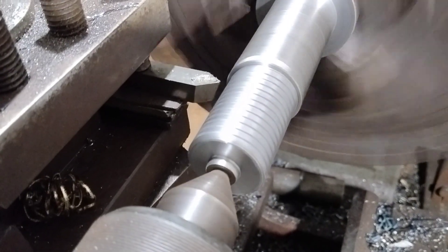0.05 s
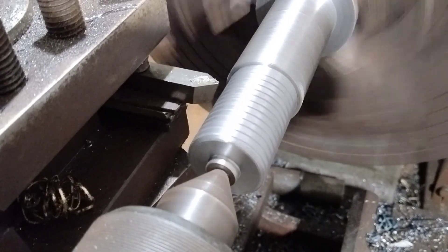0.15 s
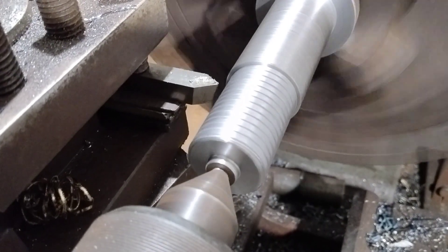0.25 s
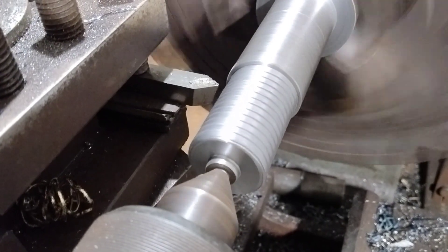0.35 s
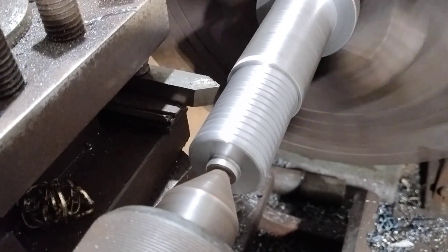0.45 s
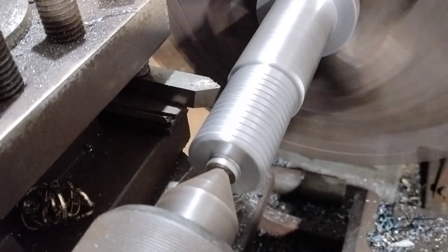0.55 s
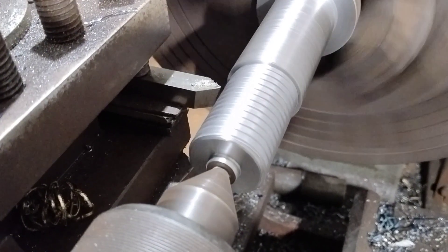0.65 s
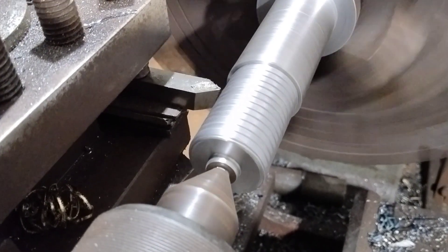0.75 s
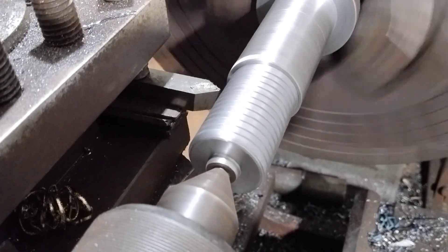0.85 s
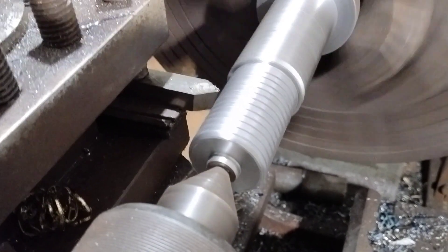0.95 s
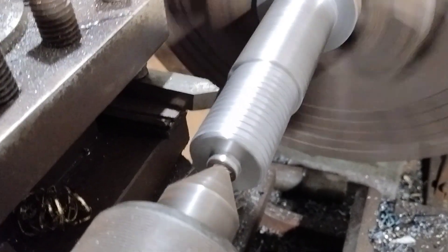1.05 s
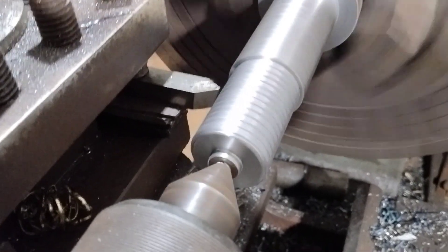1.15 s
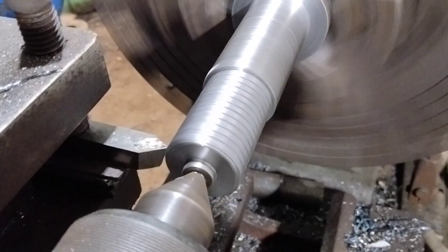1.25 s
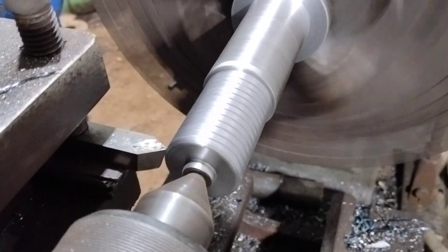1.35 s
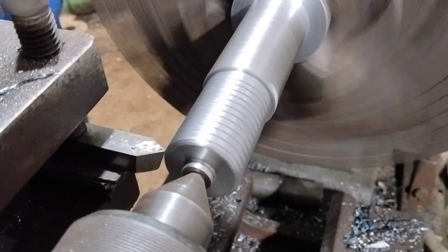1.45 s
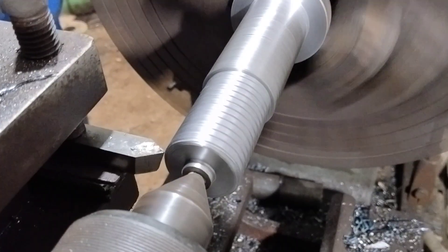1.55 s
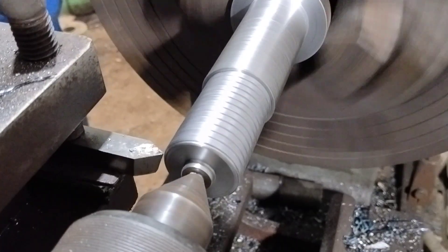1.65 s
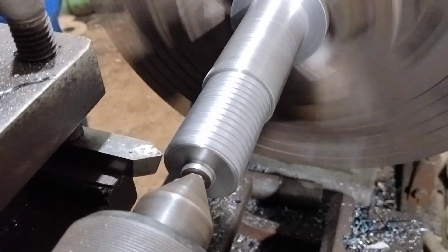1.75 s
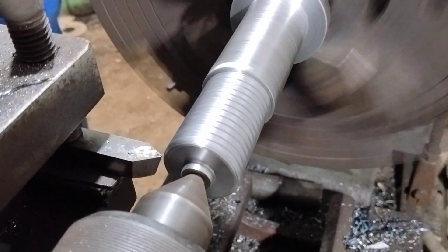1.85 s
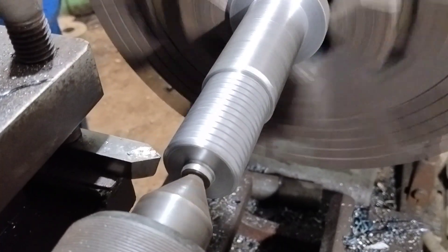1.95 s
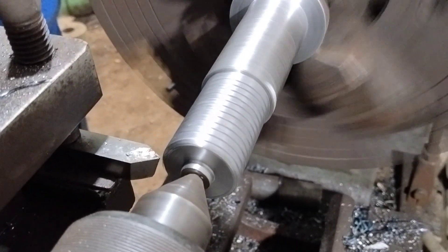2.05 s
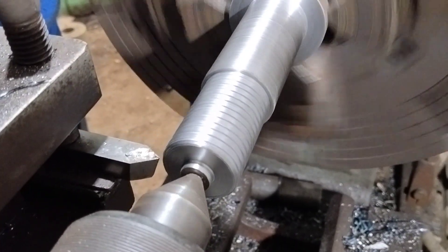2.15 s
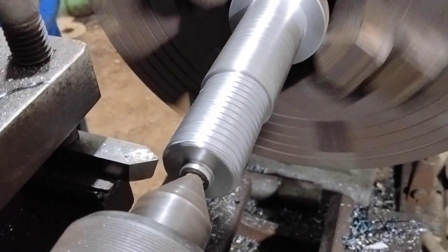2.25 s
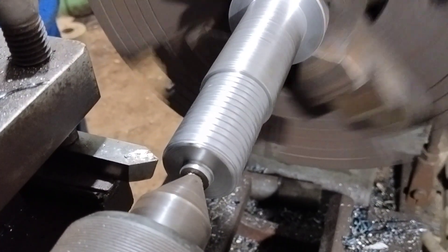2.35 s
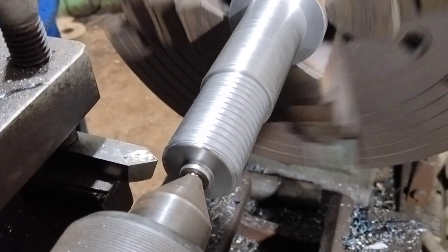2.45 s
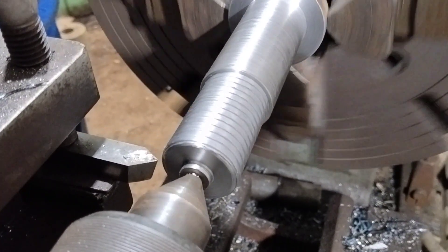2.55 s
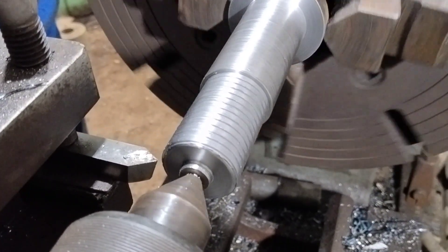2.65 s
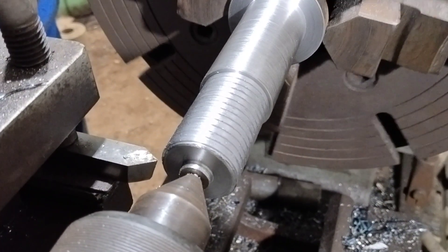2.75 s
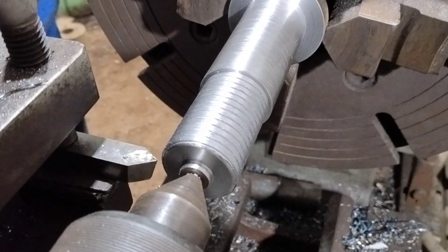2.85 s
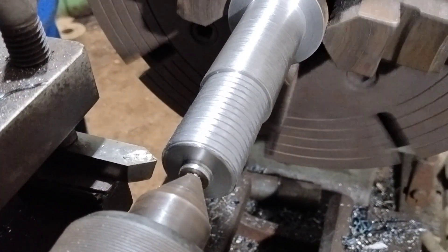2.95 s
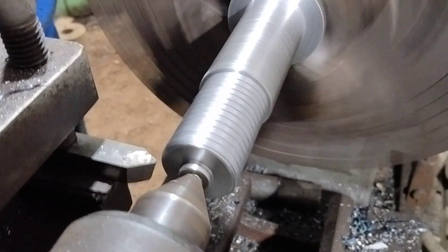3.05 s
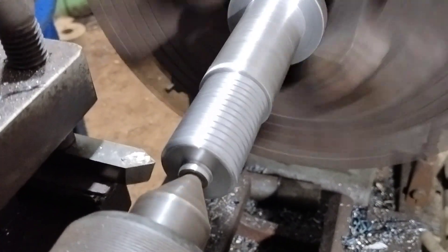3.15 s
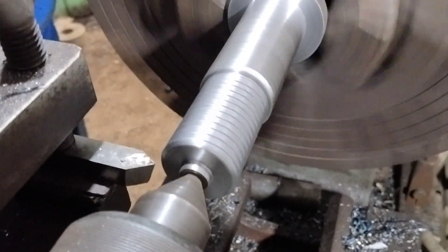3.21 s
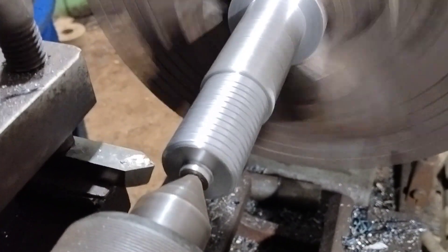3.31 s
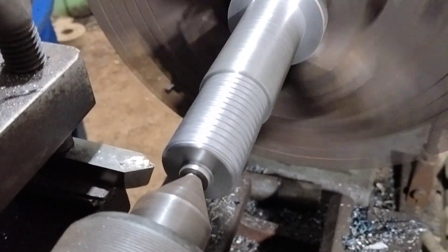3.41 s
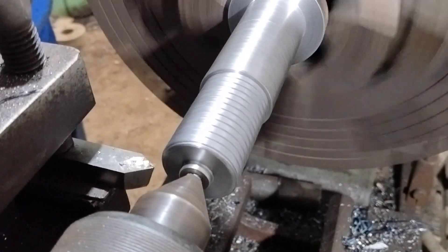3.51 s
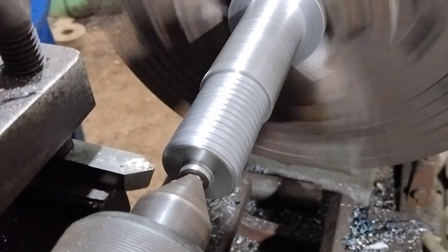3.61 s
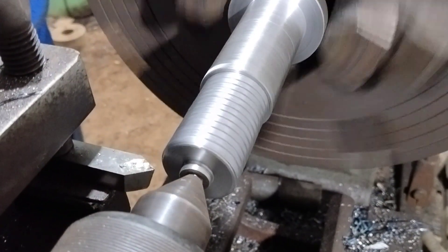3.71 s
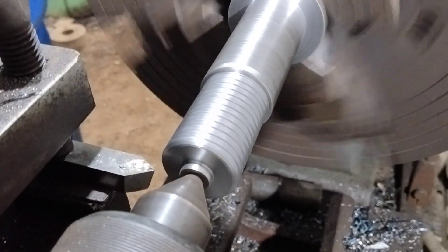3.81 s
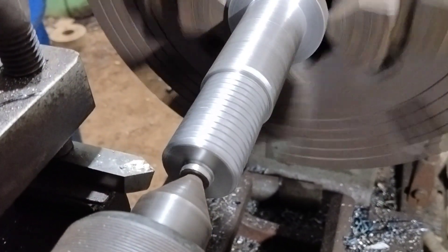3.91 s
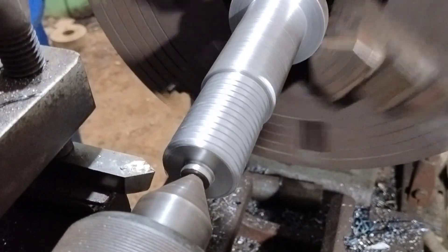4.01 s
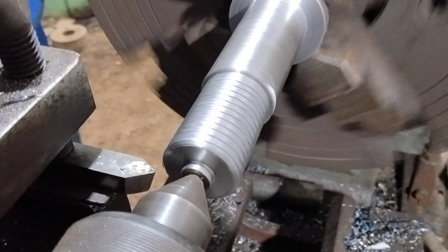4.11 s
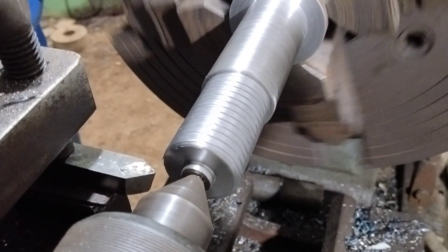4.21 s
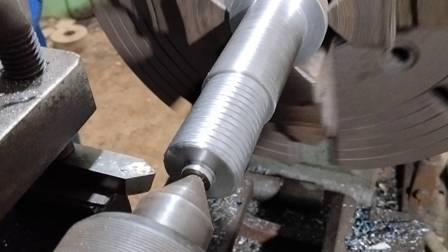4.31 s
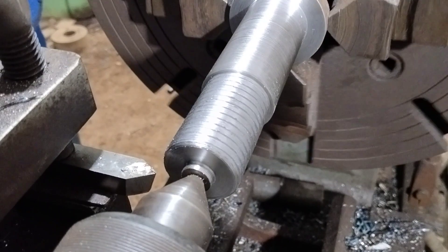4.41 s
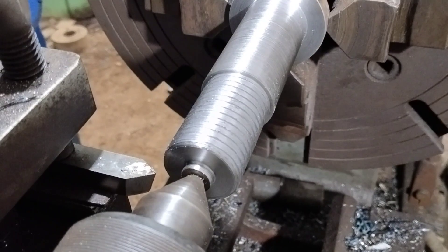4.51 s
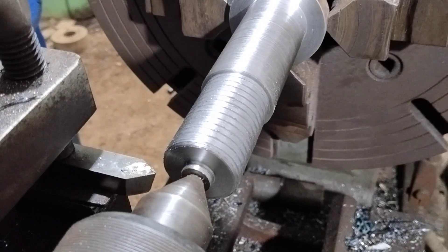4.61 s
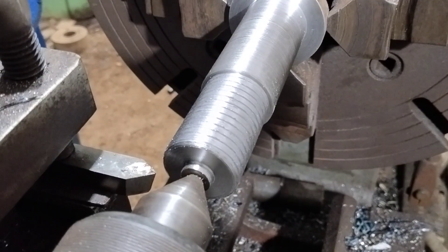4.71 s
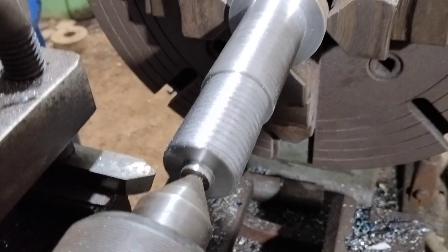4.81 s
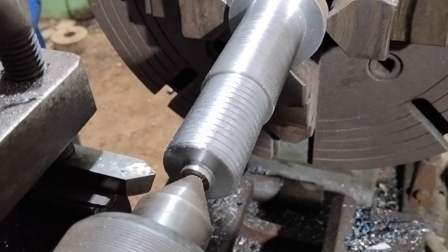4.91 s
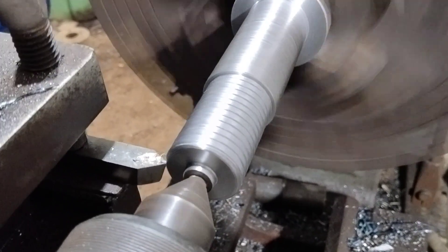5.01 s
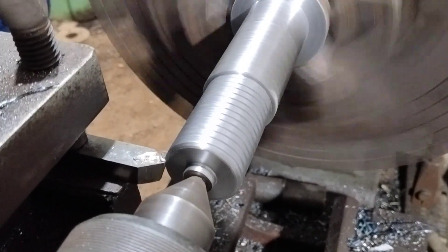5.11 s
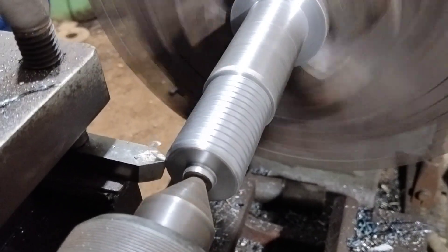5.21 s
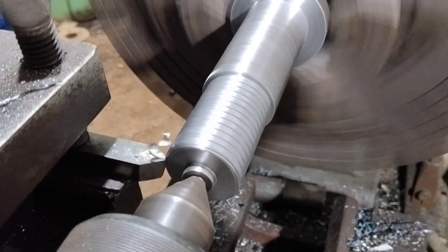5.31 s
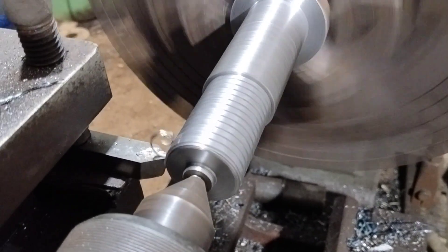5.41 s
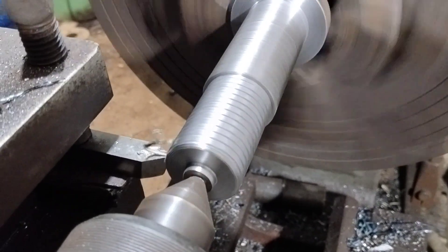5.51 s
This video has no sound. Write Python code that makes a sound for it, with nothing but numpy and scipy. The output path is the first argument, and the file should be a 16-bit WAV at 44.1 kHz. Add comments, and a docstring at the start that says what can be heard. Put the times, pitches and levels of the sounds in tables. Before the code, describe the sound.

A lathe heard close by in a workshop. From 0 to 1.15 s its headstock gears growl roughly, with a dry metallic rattle that swells about three times a second, some dull knocks and a faint upward-sliding scrape near 0.9 s. Complete silence for about a tenth of a second, then at 1.26 s a weaker growl returns; levers chatter around 1.4 s and clack sharply at 1.55 s. The gears coast down, ticking and thinning out, to almost nothing by 2.9 s. At 3.13 to 3.16 s a loud double clack and thud engage reverse, with a small high metallic ringing, fine hiss and a quick rising whine to 3.3 s. The gears run with repeated knocks, sing thinly, rasp around 4.1 s and die by 4.4 s, leaving faint rumble. At 4.98 s full gear noise snaps back in; a knock comes at 5.38 s and a tool squeal from 5.47 s to the end at 5.56 s.

```python
"""A metal lathe in a workshop, heard from beside the tool post. Its gears rattle in the cast headstock, the
sound cuts out for a tenth of a second, then levers chatter and knock and the gears coast to a halt. With a
clack they are thrown into reverse, whine up to speed, rasp and stop again; at 4.98 s the sound jumps straight
to the gears running at full speed, and the tool squeals. Random tooth impacts drive resonances of headstock,
casing and cover; noise bursts make the knocks."""
import sys
import numpy as np
from scipy import signal
from scipy.fft import rfft, irfft, next_fast_len
from scipy.io import wavfile
from scipy.ndimage import uniform_filter1d, minimum_filter1d

SR = 44100
rng = np.random.default_rng(int(sys.argv[2]) if len(sys.argv) > 2 else 0)


def generate_wav(signal):
    """Clip the signal to [-1, 1] and save it as 16-bit WAV at the path in sys.argv[1]."""
    frames = np.transpose(np.atleast_2d(signal))
    scaled = np.clip(frames, -1, 1) * 32767
    pcm = np.round(scaled).astype(np.int16)
    wavfile.write(sys.argv[1], SR, pcm)


N = 245328

# What the levers ring with. Each row: pitch in Hz, relative level in dB, t60 in s.
LEVER = [(3410, 3, 0.0037), (3845, 8.5, 0.009), (4040, 2, 0.011), (4730, 12, 0.027), (4874, 0.5, 0.0091),
         (5470, -29, 0.029), (5800, -33, 0.03)]


def undb(db):
    """Decibels to gain."""
    return 10 ** (np.asarray(db) / 20)


def unit(x):
    """Scale to rms 1."""
    return x / np.sqrt(np.mean(x ** 2))


def colour(x, points):
    """Shape by a (Hz, dB) spectrum, silent outside it."""
    hz, db = np.transpose(points)
    size = next_fast_len(N)
    f = np.maximum(np.arange(size // 2 + 1) * SR / size, 1)
    gain = undb(np.interp(np.log(f), np.log(hz), db, -120, -120))
    return irfft(rfft(x, size) * gain, size)[:N]


def resonate(x, hz, width_hz):
    """One resonance, gain 1 at its centre."""
    return signal.lfilter(*signal.iirpeak(hz, hz / width_hz, fs=SR), x)


def twice(x, hz, width_hz):
    """A resonance with steep skirts, rms 1."""
    return unit(resonate(resonate(x, hz, width_hz), hz, 3 * width_hz))


def ring(x, modes):
    """Excite (Hz, dB, t60 in s) modes; a shorter decay means a wider resonance."""
    return sum(undb(db) * resonate(x, hz, np.log(1000) / np.pi / t60) for hz, db, t60 in modes)


def walk(rate):
    """A random drift: levels held 1 / rate s and slewed twice; spread near 1."""
    k = int(SR / rate)
    steps = np.repeat(rng.standard_normal(N // k + 1), k)
    return 1.3 * uniform_filter1d(uniform_filter1d(steps, k), k)[:N]


def curves(tables):
    """Every column of a run of tables, one value a sample; a table holds its last value until the next begins."""
    t = np.arange(N) / SR
    out = np.zeros((len(tables[0][0]) - 1, N))
    for table in tables:
        s, *columns = np.transpose(table)
        out[:, t >= s[0]] = [np.interp(t[t >= s[0]], s, c) for c in columns]
    return uniform_filter1d(out, size=int(.002 * SR))  # round the corners over 2 ms


def envelope(rise, t60):
    """A short rise, then a decay (both in ms)."""
    ms = np.arange(int(.4 * SR)) * 1000 / SR
    return np.minimum(ms / max(rise, .2), 1) * 1000. ** (-np.maximum(ms - rise, 0) / max(t60, 5))


def teeth(rate, spread_db, share):
    """Irregular tooth impacts (rate per s) of scattered size, a share of the power, over rubbing noise."""
    hit = rng.random(N) < rate / SR
    size = np.minimum(rng.exponential(size=N), 3.5)  # caps the hardest impact, in spreads
    clicks = hit * undb(spread_db * size) * rng.choice([-1, 1], N)
    return np.sqrt(share) * unit(clicks) + np.sqrt(1 - share) * rng.standard_normal(N)


def waver(hz, depth):
    """A steady sine, rms 1, whose pitch wanders by a share of itself."""
    return np.sqrt(2) * np.sin(2 * np.pi * np.cumsum(hz * (1 + depth * walk(30))) / SR)


def tone(table, gain_db, waver_db, jitter):
    """A gliding, wavering, rough tone that fades in and out at the ends of its table."""
    s, hz, db = np.transpose(table)
    t = np.arange(N) / SR
    fade = np.clip(np.minimum(t - s[0], s[-1] - t) / 0.014, 0, 1)
    phase = 2 * np.pi * np.cumsum(np.interp(t, s, hz) * (1 + jitter * walk(130))) / SR
    level = undb(np.interp(t, s, db) + gain_db + waver_db * walk(80))
    return np.sqrt(2) * fade * level * np.sin(phase)


def slide(tables, width_hz):
    """A narrow band of noise whose centre and level move: slow noise carried by a gliding sine and cosine."""
    db, hz = curves(tables)
    slow = signal.lfilter(*signal.butter(2, width_hz / 2, fs=SR), rng.standard_normal((2, N)))
    phase = 2 * np.pi * np.cumsum(hz) / SR
    return undb(db) * unit(slow[0] * np.cos(phase) + slow[1] * np.sin(phase))


def workshop():
    """Coloured noise as the workshop rumble, restless in level."""
    # Each row: frequency in Hz, relative level in dB per Hz.
    shop_colour = [(15, -11.5), (35, 10.5), (60, -5), (100, -6.5), (330, -13.5), (1000, -26), (3000, -38),
                   (8000, -44.5), (15600, -41.5)]
    # The rumble dips briefly in each pause. Each row: time in s, level in dB.
    shop_level = [
        [(0, -63), (1.3, -49.5), (2.5, -52.5), (2.95, -54.5), (3.02, -68.5), (3.07, -61), (4.6, -56),
         (4.7, -58), (4.765, -73.5), (4.785, -48), (4.82, -57.5), (4.92, -60), (5.56, -55)],
    ]
    rumble = unit(colour(rng.standard_normal(N), shop_colour))
    return undb(curves(shop_level)[0] + 2. * walk(50)) * rumble


def ping():
    """A small part chatters on after the clutch: close high modes, kept ringing by fading impacts."""
    start_s, level_db, t60_s = 3.152, -28, .32
    # Each row: pitch in Hz, relative level in dB, t60 in s.
    ping_modes = [(9220, -9, .02), (9350, 0, .035), (9470, -6, .025)]
    t = np.arange(N) / SR - start_s
    ringing = ring(teeth(900., 2, .4), ping_modes)
    ringing = unit(colour(ringing, [(7500, -38.5), (8900, 6.5), (9700, -11.0), (10500, -49.5)]))
    fade = np.clip(t / .002, 0, 1) * 1000. ** (-np.maximum(t, 0) / t60_s)
    return undb(level_db) * ringing * fade


def notes():
    """Knocks and squeaks that each ring one note of the metal as narrow noise, and one click at a cut in the sound."""
    # Each row: start in s, level in dB, pitch in Hz, t60 in ms.
    note_rows = [(.99, -39, 4990, 220), (1.409, -17, 1172, 360), (1.54, -25, 5720, 115),
                 (1.555, -19, 1060, 150), (2.0, -30, 970, 340), (2.24, -38, 1580, 120),
                 (2.885, -69.5, 1540, 89), (3.056, -58, 1050, 640), (3.089, -66, 1030, 100),
                 (3.131, -20, 1323, 180), (3.153, -8, 605, 46), (3.157, -9.5, 3590, 17),
                 (3.309, -10.5, 480, 145), (3.46, -21, 810, 230), (3.63, -12.5, 987, 88),
                 (3.691, -22.5, 1295, 360), (3.905, -51, 7350, 170), (3.915, -9.5, 547, 120),
                 (4.09, -13, 494, 150), (4.255, -30, 850, 72), (4.28, -38.5, 710, 280),
                 (4.3, -55, 2720, 170), (4.855, -55, 1245, 54), (5.375, -15, 945, 120),
                 (5.4, -22.5, 120, 400), (5.5, -42, 2340, 240), (5.535, -34, 3900, 200)]
    click_s, click_db = 1.2855, -22  # where the sound was cut and joined
    out = np.zeros(N + SR)
    for s, db, hz, t60 in note_rows:
        shape = envelope(.045 * t60, t60)
        note = twice(rng.standard_normal(len(shape)), hz, 30 + .02 * hz)  # high notes are wider
        out[int(s * SR):][:len(shape)] += undb(db) * shape * note
    out[int(click_s * SR)] += undb(click_db)  # one single sample
    return out[:N]


def knocks():
    """Levers, clutch and gear play: short noise scrapes ring the levers, thud in the casting and spit treble."""
    # Each row: start in s, clack and thud level in dB (before trims), clack centre in Hz, t60 in ms.
    knock_rows = [(.295, -35.5, -13.5, 2556, 200), (.624, -36.5, -20, 3850, 37), (.68, -35, -19, 2610, 150),
                  (.755, -29.5, -18, 2510, 80), (.87, -43.5, -37.5, 6000, 30),
                  (0.937, -38, -16.5, 2200, 99), (1.361, -39, -39, 4470, 190), (1.389, -33, -33, 4100, 50),
                  (1.413, -39, -36.5, 4680, 150), (1.532, -31, -18, 5600, 75),
                  (1.543, -11, -24.5, 4850, 67), (1.553, -10.5, -14, 4580, 41),
                  (1.564, -23.5, -21, 3630, 130), (1.709, -38.5, -24.5, 3880, 71),
                  (1.777, -38.5, -31, 3860, 110), (1.875, -34.5, -25, 3600, 96),
                  (1.991, -42, -34.5, 4200, 250), (2.131, -47, -27.5, 3000, 64),
                  (2.324, -45.5, -41.5, 3880, 57), (2.407, -54, -38, 3430, 82),
                  (2.52, -52.5, -47, 3960, 140), (2.686, -55, -54, 3560, 100), (2.794, -51, -51, 4300, 73),
                  (2.817, -61, -54.5, 3920, 100), (2.879, -70, -59, 2920, 83),
                  (3.055, -54.5, -59.5, 4270, 100), (3.091, -64, -62, 4020, 35),
                  (3.128, -28.5, -38, 4500, 82), (3.135, -12, -22.5, 5040, 57),
                  (3.152, -26, -12, 4160, 130), (3.242, -31, -23.5, 3730, 110),
                  (3.294, -16.5, -13.5, 4770, 25), (3.306, -16, -15, 4550, 70),
                  (3.425, -31, -21, 2570, 140), (3.46, -33.5, -26, 2600, 100),
                  (3.575, -27, -14.5, 2360, 120), (3.605, -33, -20.5, 2284, 110),
                  (3.761, -39.5, -35.5, 5250, 60), (3.775, -32.5, -15, 2614, 90),
                  (3.843, -36.5, -41.5, 3560, 68), (3.883, -63, -19, 3020, 43),
                  (3.913, -29, -17.5, 3620, 70), (3.942, -38.5, -25.5, 4950, 44),
                  (4.295, -53.5, -44, 4500, 50), (4.325, -70, -57, 6500, 30), (4.37, -60, -58, 2800, 40),
                  (4.43, -59.5, -63.5, 4700, 297), (4.656, -84, -55.5, 2950, 46),
                  (4.782, -77, -60, 3520, 46), (4.803, -74.5, -63.5, 3490, 51),
                  (5.375, -31.5, -16.5, 4750, 160)]
    # What the casting thuds with. Each row: pitch in Hz, relative level in dB, t60 in s.
    thud_modes = [(632, -8.5, 0.048), (969, -2.5, 0.028), (1350, -4, 0.037), (1580, -9, 0.0084)]
    # The spat treble. Each row: frequency in Hz, relative level in dB per Hz.
    spit_colour = [(5500, -37.5), (6800, -2), (7800, -1.5), (9300, -9), (10300, -16.5), (12500, -31.5),
                   (15600, -33)]
    mid, low, top = np.zeros((3, N))
    for s, db, thud_db, hz, t60 in knock_rows:
        i = int(s * SR)
        shape = envelope(.09 * t60, t60)  # long scrapes start softly
        burst = shape * rng.standard_normal(len(shape))
        spit_db = db - 10.5 + 10.5 * (hz / 1000 - 5.5)  # brighter knocks spit more
        mid[i:i + len(shape)] += undb(db) * resonate(resonate(burst, hz, 3000), hz, 3000)[:N - i]
        low[i:i + len(shape)] += undb(thud_db) * burst[:N - i]
        top[i:i + len(shape)] += undb(spit_db) * burst[:N - i]
    clack = undb(7.5) * mid + undb(-1.5) * ring(mid, LEVER)
    clack = colour(clack, [(1500, -38.0), (2100, -8.5), (2800, -3.0), (6200, -9.0), (8000, -28.0), (12000, -61.0)])
    thud = undb(8.0) * low + undb(15.5) * ring(low, thud_modes)
    thud = colour(thud, [(250, -40.5), (500, 3.5), (2000, -5.0), (2800, -19.0), (5000, -79.5)])
    return clack + thud + undb(13.5) * colour(top, spit_colour)


def whine():
    """Gear whine that climbs as the spindle picks up speed, a rough gliding sine."""
    # Each row: time in s, pitch in Hz, level in dB before a small trim.
    whine_glide = [(3.17, 420, -28), (3.2, 450, -20), (3.212, 500, -23), (3.222, 560, -18),
                   (3.235, 620, -21), (3.25, 700, -15), (3.27, 740, -18), (3.295, 790, -28)]
    return tone(whine_glide, -1.5, 2., .04)


def squeal():
    """Tool tip squeal on entering the metal, a nearly steady sine."""
    # Each row: time in s, pitch in Hz, level in dB.
    squeal_glide = [(5.47, 1240, -36), (5.505, 1250, -20), (5.54, 1250, -17), (5.6, 1245, -15)]
    return tone(squeal_glide, 0, 1.5, .006)


def mesh():
    """A rough band of the gear mesh that slides and surges."""
    # Each row: time in s, level in dB, centre in Hz.
    mesh_band = [
        [(0.0, -12, 880.9), (0.03, -18, 878.3), (0.192, -26.5, 908.5), (0.246, -18, 918.6), (0.288, -21, 857.3),
         (0.326, -13, 878), (0.352, -25, 889.2), (0.424, -17.5, 885), (0.468, -22.5, 875), (0.692, -19, 886),
         (0.758, -27, 861.6), (0.796, -18, 850), (0.93, -34, 899), (0.954, -31, 904), (1.11, -18.5, 926.1),
         (1.14, -34, 960)],
        [(1.263, -37, 866.5), (1.355, -38, 909), (1.381, -24, 897.4), (1.417, -21.5, 914), (1.495, -25, 886.7),
         (1.613, -41, 920.3), (1.681, -26, 870.5), (1.861, -39, 874.4), (1.893, -28.5, 879), (1.975, -42, 894),
         (2.021, -31.5, 939), (2.059, -46, 919), (2.239, -47, 862.2), (2.399, -41, 869.1), (3.019, -99, 883),
         (3.12, -52.5, 948.8)],
        [(3.155, -30, 915.4), (3.235, -32, 833), (3.301, -22, 867.4), (3.427, -43, 868), (3.467, -21, 849.6),
         (3.689, -31, 889), (3.941, -26.5, 832), (3.975, -39.5, 883), (4.173, -28, 862), (4.213, -55, 873),
         (4.273, -32.5, 909.4), (4.313, -60, 840), (4.737, -93, 858), (4.807, -76, 874.7), (4.929, -91.5, 850),
         (4.965, -61, 854.7)],
        [(4.985, -26, 857), (5.003, -24, 867), (5.093, -28.5, 847), (5.197, -25, 903), (5.219, -31, 886),
         (5.289, -23, 829.6), (5.323, -36, 853), (5.387, -20, 905), (5.495, -34, 896), (5.56, -28, 817)],
    ]
    return slide(mesh_band, 140)


def scrape():
    """A scrape slides upward in the first stretch; a rough squeal rises and sinks in the last."""
    # Each row: time in s, level in dB, centre in Hz.
    scrape_band = [
        [(0, -120, 1900), (.83, -60, 1800), (.86, -36, 1850), (.93, -34, 2000), (.96, -44, 2050),
         (.99, -44, 2200), (1.01, -37, 2280), (1.03, -41, 2480), (1.06, -43, 2620), (1.1, -44, 2720),
         (1.14, -60, 2750)],
        [(1.2, -120, 1100)],
        [(4.985, -40, 1100), (5.15, -34, 1130), (5.2, -25, 1200), (5.25, -32, 1200), (5.33, -25, 1220),
         (5.4, -31, 1180), (5.47, -36, 1120), (5.51, -27, 1090), (5.56, -20, 1080)],
    ]
    return slide(scrape_band, 160)


def throb():
    """A flare and a slight dip that each return once a spindle turn, in dB."""
    turn_s, sharpness = .36, 6
    # Each row: time of one peak in s, height in dB at full throb share.
    flares = [(.29, 3), (0.429, -0.5)]
    t = np.arange(N) / SR
    return sum(db * np.exp(sharpness * (np.cos(2 * np.pi * (t - s) / turn_s) - 1)) for s, db in flares)


def balance(gear_db):
    """Each layer's level: its share at full speed, shifted as the growl sinks, drifting alone."""
    # Running, coasting, reversing, then full speed again after a jump. Each row: start in s, then at full speed
    # the upper group, bed, # hum and grind in dB over the growl, levers in dB over the rattle, motor in dB over
    # the growl, throb share 0-1.
    full_speed = [
        [(0.00038, -7.5, -7, -22, -22, -6, -25.5, 0.89)],
        [(1.263, -8, -6.5, -15, -21.5, -11.5, -28, .1)],
        [(3.155, -7.5, -7, -19.5, -22.5, -6, -23.5, .1)],
        [(4.985, -5, -9, -21, -21, -6.5, -13.5, 0.22)],
    ]
    # One row: dB gained per dB the growl sinks, for upper group, bed, hum, grind, levers, motor.
    linger = (-0.11, 0.12, 0.5, -0.13, 0.074, 0.0069)
    *full_db, share = curves(full_speed)
    sunk_db = -18 - gear_db  # below the growl at full speed
    return [db + k * sunk_db + 1.1 * walk(14) for db, k in zip(full_db, linger)], share


def strays(edges):
    """Sharp impacts coloured as the clutch's fine hiss, a rasp and a chattering lever."""
    # Far above the clatter, strongest while the clutch slips. Each row: time in s, level in dB.
    slip_level = [
        [(0, -81), (1.14, -80.5), (1.6, -92), (2.0, -95), (3.13, -120), (3.14, -66), (3.17, -60), (3.18, -70),
         (3.27, -64.5), (3.29, -64), (3.33, -65.5), (3.355, -72.5), (3.5, -83.5), (4.0, -92), (4.98, -120)],
        [(4.985, -81), (5.56, -72)],
    ]
    # Each row: frequency in Hz, relative level in dB per Hz.
    slip_colour = [(9500, -23.5), (10200, -3.5), (12000, -5.5), (15600, -14)]
    # Rises over the grind as the reverse run slows. Each row: time in s, level in dB.
    rasp_level = [
        [(0, -120), (3.95, -120), (4.02, -50), (4.12, -47.5), (4.2, -55), (4.27, -57), (4.33, -64), (4.38, -70),
         (4.4, -80), (4.5, -120)],
    ]
    # Before the drive is thrown out. Each row: time in s, level in dB.
    chatter_level = [
        [(0, -120), (1.27, -58.5), (1.31, -54), (1.35, -58), (1.385, -36), (1.405, -52), (1.425, -32),
         (1.45, -45), (1.475, -45.5), (1.5, -53), (1.53, -120)],
    ]
    # Stacked bands of the chatter. Each row: centre in Hz, width in Hz, relative level in dB.
    chatter_bands = [(3300, 200, -9), (4150, 190, 0), (4750, 190, -3), (6200, 500, -16)]
    slip = undb(curves(slip_level)[0]) * unit(colour(edges, slip_colour))
    rasp = undb(curves(rasp_level)[0]) * twice(edges, 2780, 850)
    chatter = sum(undb(db) * twice(edges, hz, w) for hz, w, db in chatter_bands)
    return slip + rasp + undb(curves(chatter_level)[0]) * chatter


def clatter(edges, rattle_db, grind_db, hiss_db, lever_db, flare_db):
    """Sharp impacts filtered into rattle, levers, grind and hiss, which flare with the spindle."""
    # Each row of these three: frequency in Hz, relative level in dB per Hz.
    rattle_colour = [(2600, -37.5), (3100, 3), (3800, 0.5), (4350, 2.5), (4800, -16.5), (5300, -10),
                     (6200, -36), (7000, -46.5)]
    grind_colour = [(1600, -23.5), (2000, 0), (2500, -1.5), (3000, -8.5), (3500, -30)]
    hiss_colour = [(4500, -33.5), (5500, -4.5), (6500, -8), (7200, -7), (7800, -5.5), (8600, -13.5),
                   (9400, -10), (9900, -19.5), (10300, -26), (12500, -41.5), (15600, -46.5)]
    levers = unit(sum(undb(db + 2. * walk(30)) * twice(edges, hz, 260) for hz, db, _ in LEVER))
    rattle = unit(colour(edges, rattle_colour)) + undb(lever_db) * levers
    grind = unit(colour(edges * undb(1.5 * walk(23)), grind_colour))
    # each band of the hiss flickers alone
    bands_hz = (5400, 6100, 6900, 7700, 8600, 9500, 12000)
    bands = sum(undb(3.2 * walk(30)) * resonate(edges, hz, hz / 9) for hz in bands_hz)
    hiss = unit(colour(bands * undb(1.2 * walk(30)), hiss_colour))
    out = undb(rattle_db + flare_db) * rattle
    out = out + undb(grind_db + 0.96 * flare_db) * grind
    return out + undb(hiss_db + 0.95 * flare_db) * hiss


def cover_plate(force):
    """The cover's thin note, struck and singing, which surges and fades through each run-down."""
    # Each row: time in s, level in dB before flutter.
    cover_level = [
        [(0, -54), (.33, -45), (.55, -54), (.97, -44), (1.14, -63)],
        [(1.263, -61), (1.66, -52), (1.74, -45), (1.82, -46), (1.95, -54), (2.07, -56), (2.14, -46),
         (2.21, -60), (2.3, -57), (2.4, -57), (2.45, -50), (2.49, -58), (2.53, -54), (2.62, -62), (2.75, -68),
         (2.8, -80), (3.12, -110)],
        [(3.155, -45), (3.5, -49.5), (3.7, -45), (3.78, -33), (3.835, -35), (3.865, -44), (3.9, -39),
         (4.03, -48), (4.058, -35), (4.092, -48), (4.15, -34), (4.182, -42), (4.203, -33), (4.225, -41),
         (4.25, -39), (4.29, -54), (4.33, -45), (4.37, -53), (4.4, -64), (4.48, -66), (4.57, -77), (4.7, -100),
         (4.965, -100)],
        [(4.985, -44), (5.16, -39), (5.26, -54), (5.36, -38), (5.45, -50), (5.56, -50)],
    ]
    cover_hz, width_hz = 1812, 22
    note = unit(twice(force, cover_hz, width_hz) + undb(3) * waver(cover_hz, .003))
    return undb(curves(cover_level)[0] + 1.5 * walk(60)) * note


def casing_ring(force):
    """The casing half sings by itself: a wavering tone under its struck ring, in a skirt of broad growl."""
    # Each row: time in s, level in dB.
    casing_level = [
        [(0.0, -23.5), (0.184, -21), (0.254, -44), (0.364, -21.5), (0.72, -27.5), (0.738, -31.5), (0.974, -23),
         (1.14, -32)],
        [(1.263, -43), (1.3, -27), (1.39, -18.5), (1.5, -13), (1.54, -20.5), (1.59, -18.5), (1.62, -32.5),
         (1.75, -35), (1.85, -31), (2.0, -33.5), (2.11, -27), (2.17, -45.5), (2.25, -37), (2.42, -47.5),
         (2.55, -47.5), (2.72, -54.5), (3.05, -86), (3.12, -62.5)],
        [(3.155, -32.5), (3.19, -25.5), (3.24, -31.5), (3.28, -24.5), (3.31, -23), (3.35, -17.5), (3.42, -23),
         (3.55, -24), (3.7, -18.5), (3.9, -22.5), (4.05, -24.5), (4.12, -28), (4.18, -18), (4.23, -28),
         (4.3, -36), (4.36, -56), (4.5, -56), (4.63, -75), (4.93, -82.5), (4.965, -64)],
        [(4.985, -22), (5.0, -25), (5.06, -28), (5.11, -19.5), (5.14, -22.5), (5.17, -25), (5.24, -24),
         (5.32, -30.5), (5.45, -26), (5.56, -23)],
    ]
    casing_hz, width_hz = 325, 22
    sing = undb(-.4 + 1.8 * walk(40)) * waver(casing_hz, 0.03112)
    casing = unit(twice(force, casing_hz, width_hz) + sing)
    casing = casing + undb(-1) * twice(force, 318.7, 54.6)
    return undb(curves(casing_level)[0]) * casing


def headstock(force, upper_db, bed_db, hum_db, motor_db):
    """Gear growl: tooth impacts ring the headstock and bed, over noise bands for hum and motor."""
    # Lower group, upper group and bed. Each row: pitch in Hz, width in Hz, relative level in dB.
    head_modes = [(386.7, 42, 2.5), (460.5, 58, 3), (520, 74, 3.5), (693, 40, -6.5), (759, 220, 3.5),
                  (929.5, 140, -6)]
    upper_modes = [(1118, 23, 1.5), (1221, 83, 4.5), (1360, 48, 1.5), (1446, 120, 3.5), (1560, 130, -14.5),
                   (1809, 75, -6), (2060, 2300, -10)]
    bed_modes = [(193.8, 100, -6), (270.6, 70, 6)]
    # Each row: frequency in Hz, relative level in dB per Hz.
    hum_colour = [(12, -50), (20, -8), (54, -7), (85, 7), (120, 4), (162, 1.5), (200, -9), (260, -32),
                  (440, -120)]

    def body(modes):
        """Resonances that flicker alone as the load shifts between teeth."""
        return unit(sum(undb(db + 2.0 * walk(30)) * twice(force, hz, w) for hz, w, db in modes))

    noise = rng.standard_normal(N)
    hum = unit(colour(noise, hum_colour))
    motor = twice(noise, 114, 16)
    growl = body(head_modes) + undb(upper_db) * body(upper_modes) + undb(bed_db) * body(bed_modes)
    return growl + undb(hum_db) * hum + undb(motor_db) * motor


def drive():
    """Soft tooth impacts shake headstock, casing and cover; a denser, sharper series makes the clatter."""
    # Load on the gear train. Each row: time in s, gear growl, edge rattle and metal hiss in dB (before flares).
    load = [
        [(0, -15, -41.5, -50), (.15, -15.5, -42.5, -60.5), (.3, -16.5, -39.5, -51.5), (.43, -15.5, -44, -54),
         (.52, -17.5, -45, -61), (.66, -17.5, -43, -53), (.74, -17, -44.5, -58.5), (.78, -17.5, -46, -55),
         (.9, -16.5, -42.5, -59.5), (.96, -15.5, -44.5, -54.5), (1.01, -20, -44, -53),
         (1.09, -15.5, -44, -57.5), (1.14, -25, -47, -53.5)],
        [(1.263, -21.5, -47, -50), (1.29, -20.5, -46.5, -55), (1.35, -21.5, -48.5, -63), (1.4, -19, -45, -47),
         (1.45, -20, -52, -63), (1.585, -22.5, -41, -45.5), (1.62, -26, -50, -60.5), (1.85, -27, -49.5, -63),
         (2.1, -30, -59, -67.5), (2.17, -32, -55.5, -67.5), (2.46, -38, -63.5, -75.5), (2.55, -43, -64, -77),
         (2.68, -51.5, -81.5, -80.5), (2.8, -67, -77.5, -89.5), (3.03, -96, -100, -100),
         (3.12, -79.5, -76, -99.5)],
        [(3.155, -28, -54, -56), (3.23, -21, -47, -50.5), (3.27, -15.5, -47, -53.5), (3.3, -18.5, -41, -46.5),
         (3.45, -16.5, -41.5, -55), (3.7, -16.5, -46.5, -60.5), (3.95, -18, -51, -67),
         (4.07, -20.5, -53.5, -62), (4.19, -24.5, -65.5, -71.5), (4.29, -32, -71.5, -70), (4.38, -48, -70, -73),
         (4.48, -52, -75.5, -74.5), (4.62, -66, -95, -95), (4.76, -80, -99, -99), (4.8, -61.5, -82, -88.5),
         (4.965, -73, -99, -99)],
        [(4.985, -18, -41, -46), (5.1, -16.5, -39.5, -51), (5.3, -16.5, -43, -51), (5.47, -16, -45, -47),
         (5.5, -18.5, -43, -46), (5.56, -17, -44, -48.5)],
    ]
    # Soft oiled contact between teeth. Each row: frequency in Hz, relative level in dB.
    contact = [(60, -27.5), (150, 16), (1800, 10), (2600, 3), (4000, -58.5)]
    gear_db, rattle_db, hiss_db = curves(load)
    (upper_db, bed_db, hum_db, grind_db, lever_db, motor_db), share = balance(gear_db)
    force = colour(teeth(700., 2.36, 0.46) * undb(0.83 * walk(30)), contact)
    edges = teeth(1400.0, 3.9, 0.18) * undb(2.5 * walk(35))
    growl = undb(gear_db) * headstock(force, upper_db, bed_db, hum_db, motor_db)
    sharp = clatter(edges, rattle_db, gear_db + grind_db, hiss_db, lever_db, share * throb())
    return growl + casing_ring(force) + cover_plate(force) + sharp + strays(edges) + mesh() + scrape()


def scene():
    """The quiet workshop, knocks, tones and the machine."""
    details = ping() + notes() + knocks() + whine() + squeal()
    return (workshop() + details + drive())[None]


def record(dry):
    """A look-ahead limiter holds the peaks, the sound is cut hard to its stretches, then the top is removed."""
    # Each row: start and end of a heard stretch in s; silence lies between.
    heard = [(0, 1.145), (1.263, 4.984), (4.985, 5.56)]
    limit, window_s, top_hz = .63, .012, 15700
    k = int(window_s * SR)
    gain = np.minimum(1, limit / (np.abs(dry) + 1e-9))
    gain = uniform_filter1d(minimum_filter1d(gain, k), k)
    t = np.arange(N) / SR
    on = sum((t >= a) & (t < b) for a, b in heard) + (t >= heard[-1][1])  # the last runs to the end
    low_pass = signal.ellip(8, .2, 70, top_hz, fs=SR, output="sos")
    return signal.sosfilt(low_pass, dry * gain * on)


dry = scene()
out = record(dry)
generate_wav(out)
```